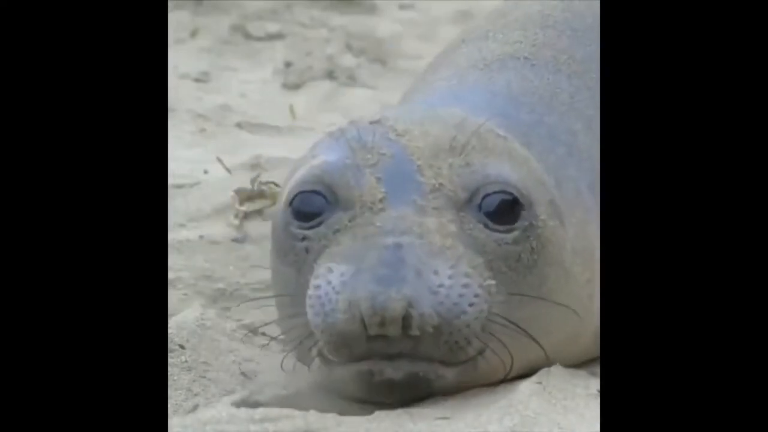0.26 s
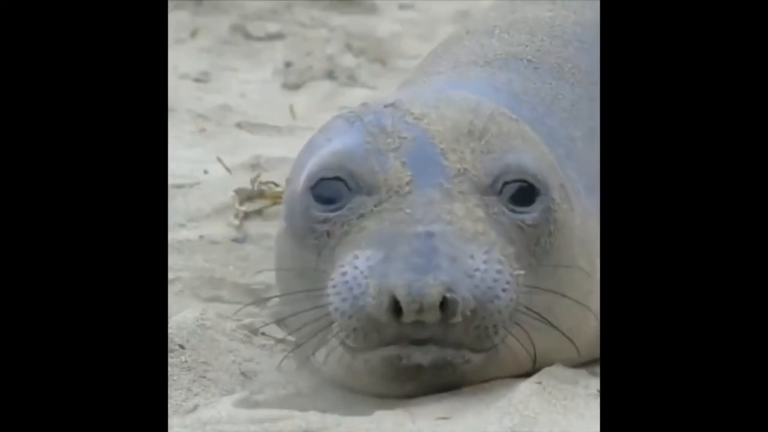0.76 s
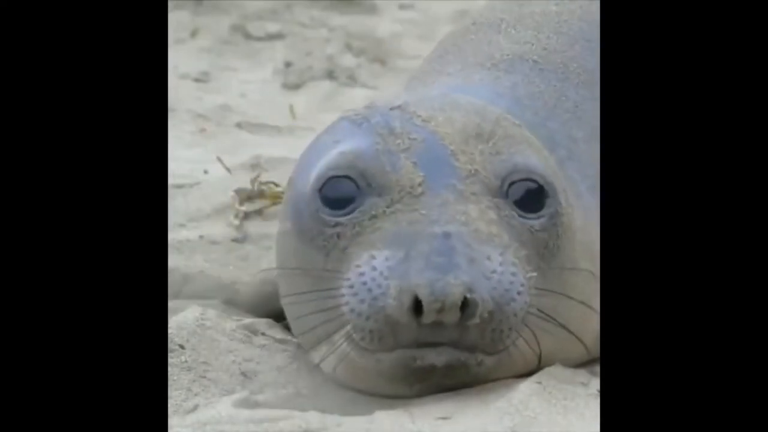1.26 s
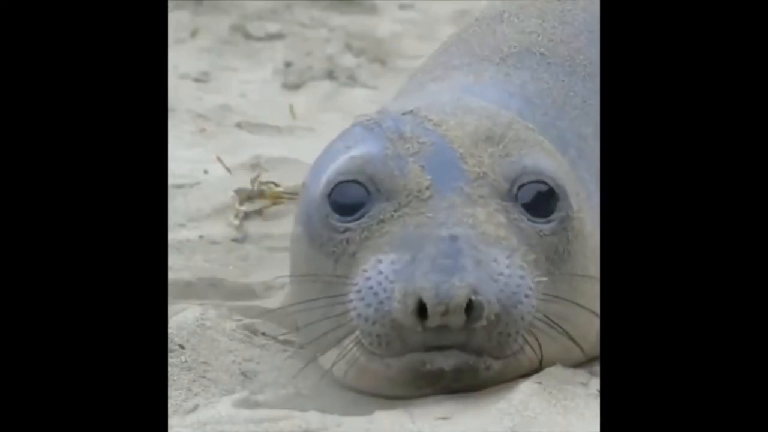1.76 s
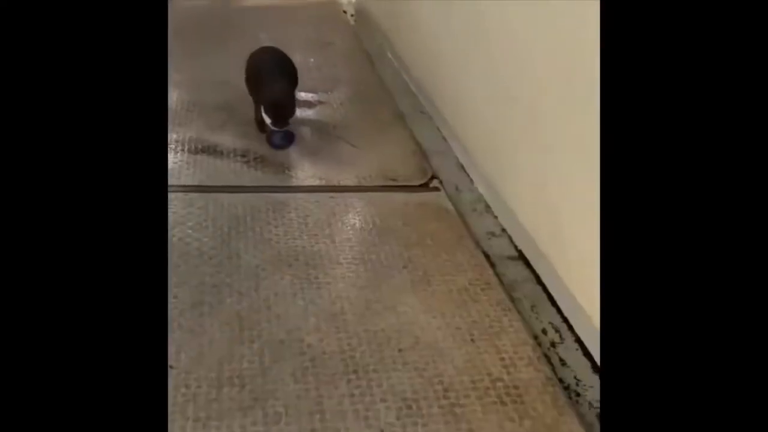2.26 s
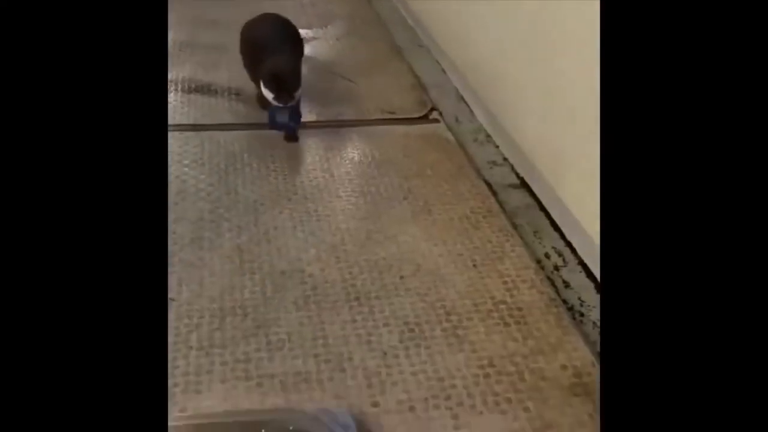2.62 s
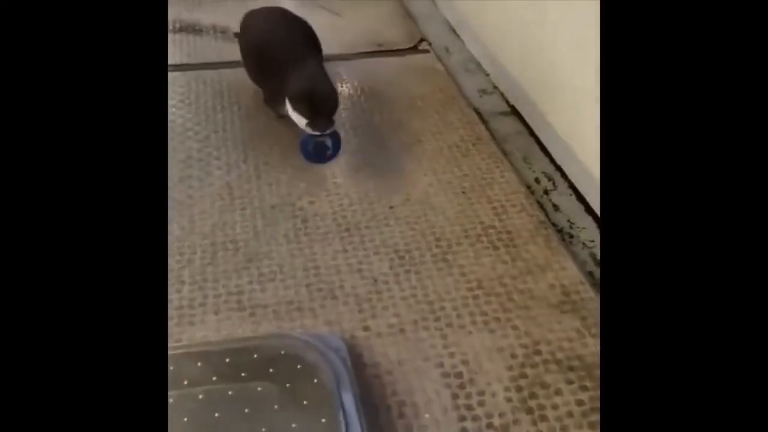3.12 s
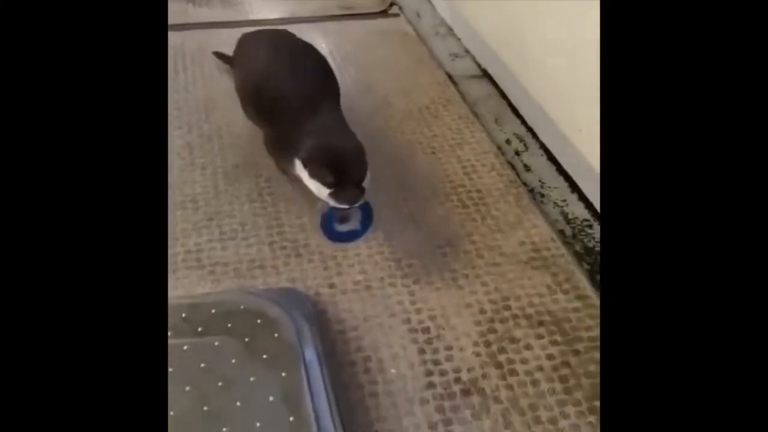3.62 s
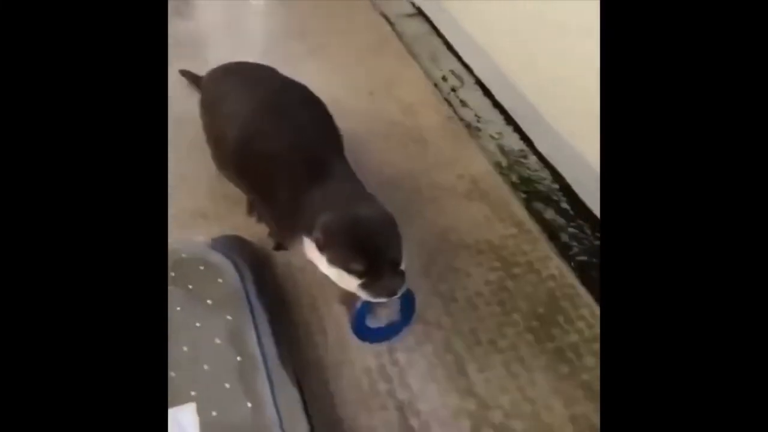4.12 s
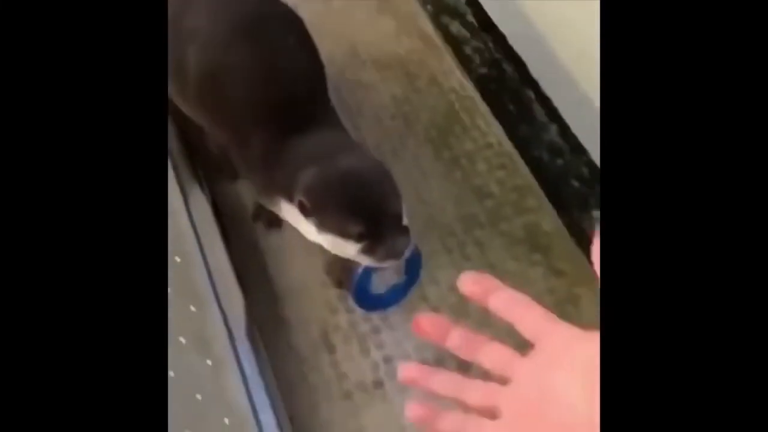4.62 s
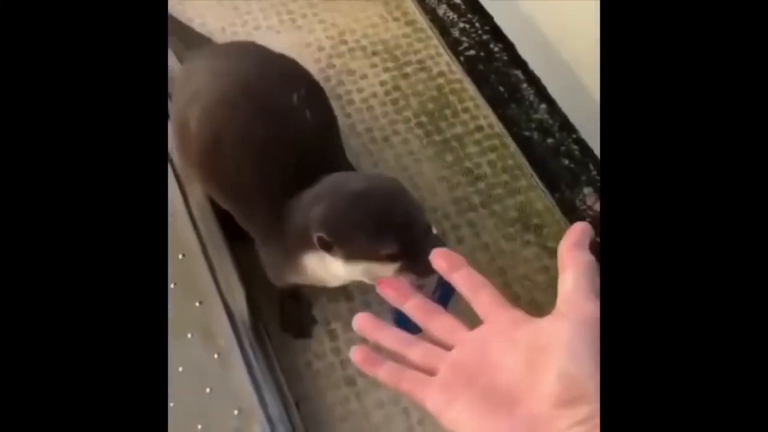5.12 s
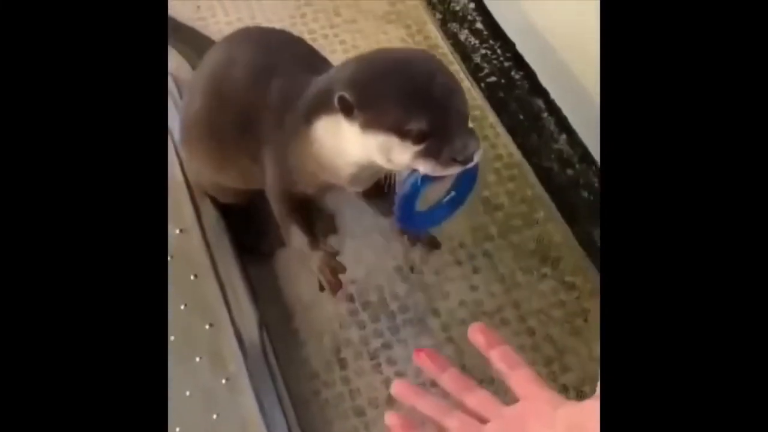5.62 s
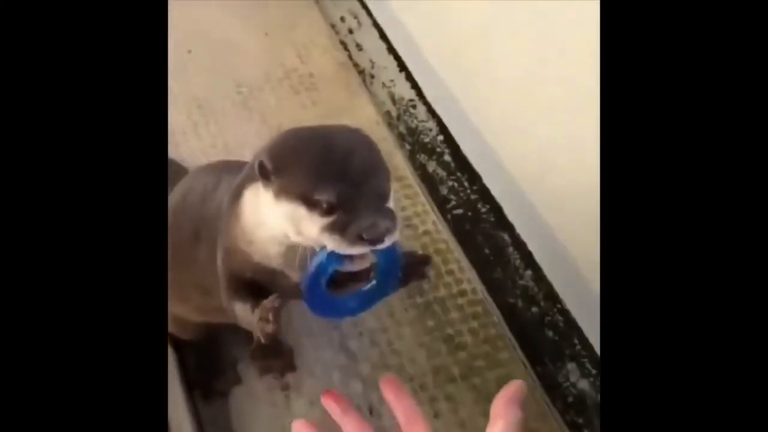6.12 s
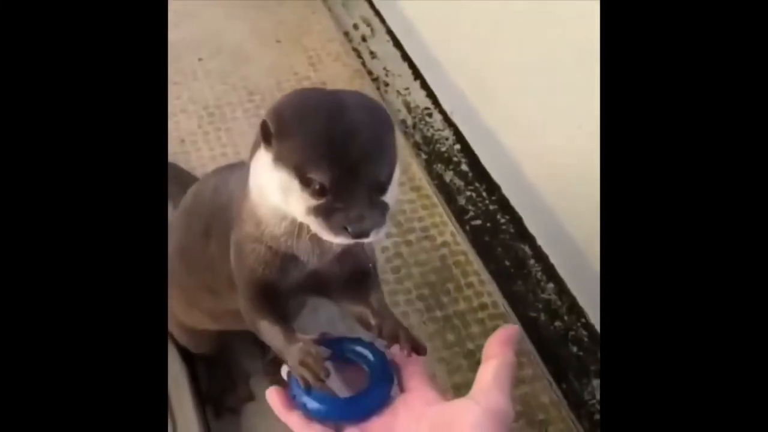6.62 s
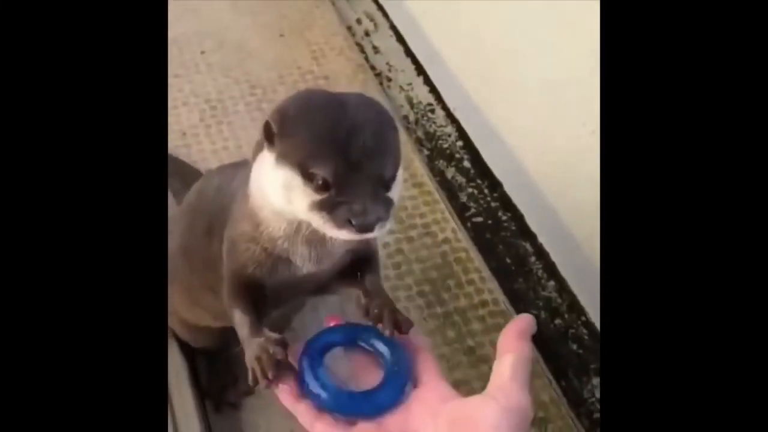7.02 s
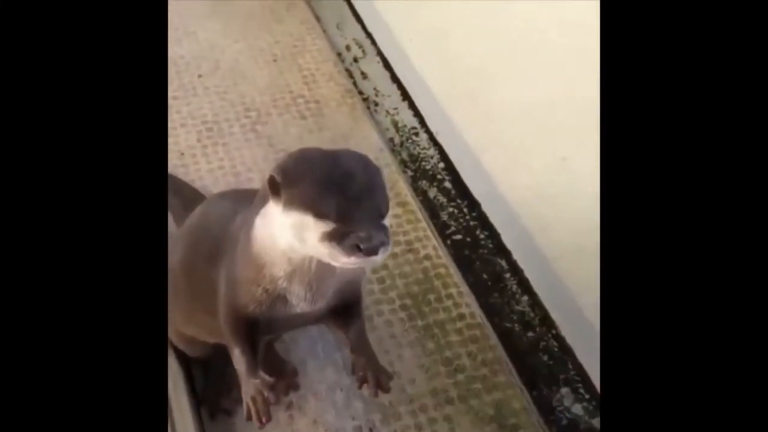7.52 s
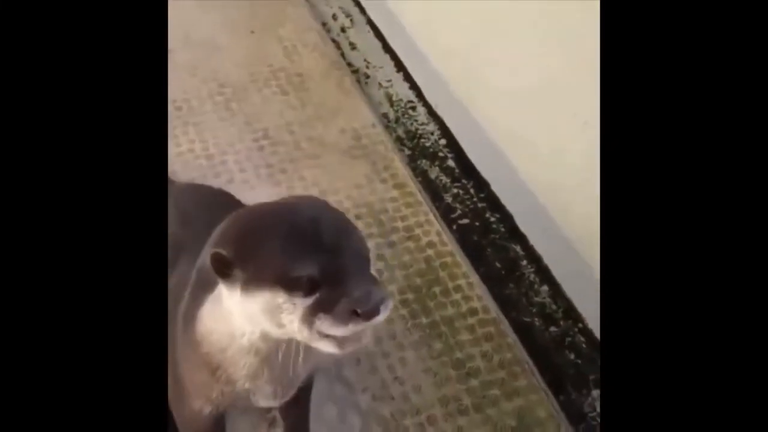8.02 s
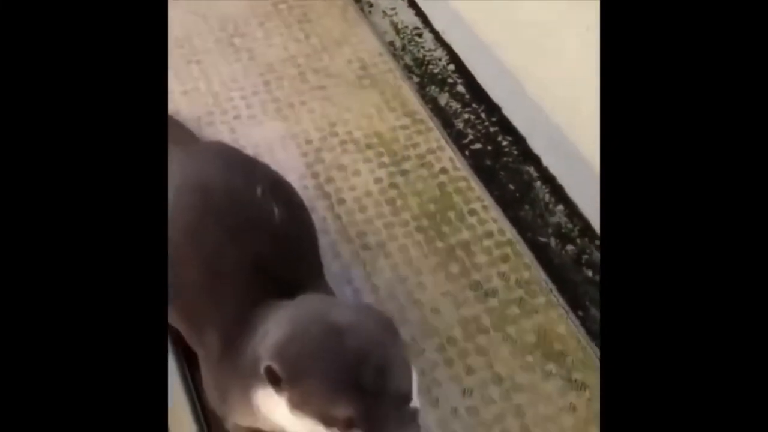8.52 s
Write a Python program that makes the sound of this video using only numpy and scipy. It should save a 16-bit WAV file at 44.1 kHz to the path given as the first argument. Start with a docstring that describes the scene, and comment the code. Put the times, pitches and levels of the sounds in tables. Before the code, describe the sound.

From 0 to about 2.15 seconds, an even, soft surf wash with flickering spray lies under a young seal close by. It gives a tiny low grunt at 0.2, a swelling nostril hiss ending in a puff by 0.7, then short, muffled, wavering hoots until 2.0. The surf cuts out; silence lasts until 2.35. A small hard-walled pen then begins with ventilation rumble, faint hum and a cluster of dull bumps until 2.8. An otter squeals and chirps roughly, with a falling whine at 3.0-3.5, chirps near 3.9, and a longer squeal at 4.0-4.85. Teeth and ring click around 4.7-5.3. Chirps at 5.4 lead into a piercing whine until 6.1, then a wavering, descending squeal from 6.5 to 7.5. Afterward only claw ticks, soft thuds, scuffs, a sharper click at 8.2 and a thin fur brush remain over the rumble.

```python
"""Seal on a beach, then an otter in a pen

A young seal gives low, soft grunts and a snort over the wash of the surf; both are built from waves and coloured noise.
After a short silence an otter trots up with a plastic ring in a small hard-walled pen. Its quick chirps and long
falling squeals are stacks of overtones shaped by throat and mouth, with breath noise for the rough parts.
Bumps, claws and the ring click and echo over a low ventilation rumble and a faint hum."""
import sys
import numpy as np
from scipy import signal
from scipy.fft import rfft, irfft
from scipy.io import wavfile
from scipy.ndimage import uniform_filter1d, map_coordinates

SR = 44100
rng = np.random.default_rng(int(sys.argv[2]) if len(sys.argv) > 2 else 0)


def int16_out(signal):
    """Quantize to a 16-bit WAV file."""
    q = np.round(np.clip(np.atleast_2d(signal).T, -1, 1) * 32767)
    wavfile.write(sys.argv[1], SR, q.astype(np.int16))


N = 386316
TIME = np.arange(N) / SR
CUTOFF_HZ = 14000   # top of the voices and of the final sound


def from_db(db):
    """Turn decibels into a plain multiplier."""
    return 10 ** (np.asarray(db) / 20)


def rms_one(x):
    """Scale a sound to unit power."""
    return x / np.sqrt(np.mean(x ** 2) + 1e-20)


def at_hz(points, hz):
    """Read a spectrum between its points, on a log-frequency axis."""
    f, value = np.transpose(points)
    return np.interp(np.log(np.maximum(hz, 1)), np.log(f), value)


def along(rows, t):
    """Read every column of a curve at the times t."""
    s, *columns = np.transpose(rows)
    return [np.interp(t, s, c) for c in columns]


def resonance(hz, centre_hz, octaves):
    """Bell of height 1 on a log-frequency axis, at half height the given octaves from its centre."""
    return 1 / (1 + (np.log2(hz / centre_hz) / octaves) ** 2)


def filtered(x, hz, kind, order=2):
    """Keep part of the spectrum with a Butterworth filter."""
    hz = np.clip(hz, 10, SR / 2 - 100)
    return signal.sosfilt(signal.butter(order, hz, kind, fs=SR, output="sos"), x)


def noise(spectrum):
    """Steady noise of a given colour, at unit power."""
    gain = from_db(at_hz(spectrum, np.fft.rfftfreq(N, 1 / SR)))
    return rms_one(irfft(rfft(rng.standard_normal(N)) * gain, N))


def drift(rate, t):
    """Smooth random wandering with spread near 1; the rate is in random points per second."""
    knots = rng.standard_normal(4096)
    return map_coordinates(knots, [(t - t[0]) * rate], order=2, mode="wrap")


def gate(t, start, end, edge_s):
    """1 between start and end, with short ramps."""
    opening = np.clip((t - start) / edge_s + .5, 0, 1)
    closing = np.clip((end - t) / edge_s + .5, 0, 1)
    return opening * closing


def add(out, start, sound):
    """Mix a sound in from a given time."""
    i = max(round(start * SR), 0)
    out[i:i + len(sound)] += sound[:N - i]


def gesture(rows, glide_s):
    """Times, soft gate and rounded control curves of one call."""
    s, *columns = np.transpose(rows)
    t = np.arange(s[0] - glide_s / 2, s[-1] + glide_s / 2, 1 / SR)
    width = int(glide_s * SR) + 1
    curves = [uniform_filter1d(np.interp(t, s, c), width) for c in columns]
    return t, gate(t, s[0], s[-1], glide_s), curves


# how loud the wash is, with an abrupt cut in the sound near the end: (time [s], level [dB])
SURF_LEVEL = [(0.02, -40), (0.96, -42.5), (0.99, -43), (1.97, -41), (2.1, -42), (2.1, -65), (2.12, -35.5),
              (2.14, -45)]
# colour of the surf: (frequency [Hz], level [dB])
SURF_COLOUR = [(18, -85), (30, -35), (61, -10), (102, -12.5), (132, -3.5), (173, -4), (207, -5),
               (266, -1.5), (317, -6.5), (706, -10), (1230, -8), (2950, -12), (4990, -23.5), (10600, -41),
               (12000, -51), (15600, -85), (22000, -120)]


def surf(spray_db=-12.5, split_hz=4300, flicker_db=1.5):
    """Even wash of coloured noise with a fizz of spray flickering on top."""
    wash = filtered(noise(SURF_COLOUR), split_hz, "low", order=4)
    wash = wash / np.std(filtered(wash, [400, 4000], "band"))   # unit power in the middle range
    fizz = filtered(noise(SURF_COLOUR), split_hz, "high", order=4)
    fizz = rms_one(filtered(fizz, 11800, "low", order=16))
    flickering = from_db(spray_db + flicker_db * drift(14.2, TIME))
    return (wash + fizz * flickering) * from_db(along(SURF_LEVEL, TIME)[0])


# colour of the ventilation: (frequency [Hz], level [dB])
VENTILATION_COLOUR = [(25, -17), (55, 2), (115, 1.5), (200, -6), (330, -8.5), (550, -14.5), (1300, -17),
                      (2100, -19.5), (3200, -29), (5200, -29), (7500, -38.5), (14500, -38)]


def ventilation(level_db=-48.5, waver_db=1.95):
    """Low rumble of moving air: coloured noise that wavers a little."""
    return noise(VENTILATION_COLOUR) * from_db(level_db + waver_db * drift(12, TIME))


def hum(pitch_hz=119, level_db=-56, waver_db=0.97):
    """Faint steady hum: one sine wave of slightly wandering level."""
    tone = np.sqrt(2) * np.sin(2 * np.pi * pitch_hz * TIME)
    return tone * from_db(level_db + waver_db * drift(7.3, TIME))


# echo of the pen: (frequency [Hz], time to fade by 60 dB [s], relative level [dB])
PEN_ECHO = [(202, 0.46, -20), (940, 0.45, -11), (2090, 0.18, -3), (3020, 0.22, -21), (6230, 0.44, -7),
            (11800, 0.049, -6.5)]


def pen_echo(x):
    """Close hard walls: a dense tail whose bands fade at their own speeds, the highest fastest."""
    t, table = np.arange(SR // 2) / SR, np.array(PEN_ECHO)
    edges, tail = np.geomspace(110, 14080, 8), 0   # seven bands, one octave each
    for low, high in zip(edges, edges[1:]):
        t60, db = (at_hz(table[:, [0, c]], np.sqrt(low * high)) for c in (1, 2))
        decay = from_db(-60 * t / t60) * np.clip(t / 0.0014, 0, 1)
        band = filtered(rng.standard_normal(len(t)), [low, high], "band")
        tail = tail + from_db(db) * band * decay / np.linalg.norm(decay)
    return signal.fftconvolve(x, tail)[:N]


def brush(start_s=8.15, end_s=8.44, swell_s=0.15, level_db=-60, low_hz=9000):
    """Fur sweeps past close by: a thin, airy swell of high noise."""
    hiss = rms_one(filtered(rng.standard_normal(N), [low_hz, CUTOFF_HZ], "band"))
    return hiss * gate(TIME, start_s, end_s, swell_s) * from_db(level_db + 2 * drift(60, TIME))


# colour of the scuffs: (frequency [Hz], level [dB])
SCUFF_COLOUR = [(1000, 3.5), (2000, 15), (3200, 7), (5300, 4.5), (7200, 2.5), (10500, -5), (13200, -18),
                (14500, 13.5)]
# scuffs of fur and paws on the floor: (middle [s], half length [s], level before the trim [dB])
SCUFFS = [(3.717, 0.13, -42), (4.04, 0.091, -33.5), (4.156, 0.13, -53), (5.19, 0.18, -48.5),
          (6.26, 0.12, -44.5), (7.573, 0.28, -45), (8.258, 0.18, -46), (8.44, 0.22, -45)]


def scuffs(floor_db=-57.5, trim_db=-7.0, grain_db=3.5, catch_db=4.5):
    """Each scuff swells and fades over a faint floor; fur and paws catch and slip in small grains."""
    level = from_db(floor_db)   # the trim lowers this too
    for middle_s, half_s, db in SCUFFS:
        level = level + from_db(db) * np.exp(-((TIME - middle_s) / half_s) ** 2)
    unevenness_db = catch_db * drift(30, TIME) + grain_db * drift(350, TIME)
    return noise(SCUFF_COLOUR) * level * from_db(trim_db + unevenness_db)


# claw ticks while the otter walks and turns:
# (start [s], end [s], pace [ticks per s], level before filtering and chance [dB])
PATTER = [(2.399, 8.4, 3.5, -48.5), (7.549, 8.1, 7.4, -57)]


def patter(t60=0.02, spread_db=5, low_hz=2800, high_hz=9500):
    """Claws tick on the floor at an uneven pace: tiny fading bursts of noise."""
    out, t = np.zeros(N), np.arange(SR // 20) / SR
    for start, end, per_s, level_db in PATTER:
        for s in np.arange(start, end, 1 / per_s):
            burst = rng.standard_normal(len(t)) * from_db(-60 * t / t60)
            tick = filtered(burst, [low_hz, high_hz], "band", order=1)
            level = from_db(level_db + spread_db * rng.uniform(-1, 1))
            add(out, s + rng.random() / per_s, level * tick)
    return out


# dull bumps: (time [s], thud level [dB], thud pitch [Hz], knock against thud before the trim [dB])
BUMPS = [(2.354, -19, 132, -0.5), (2.386, -16, 121, -11.5), (2.423, -18.5, 216, -29),
         (2.452, -16, 189, -1.5), (2.47, -14, 131, -33), (2.554, -18, 108, -10.5), (2.591, -20, 210, -2),
         (2.605, -14, 87.6, -35), (2.654, -18.5, 91, -42), (2.706, -26, 149, -28), (2.796, -20, 147, -32),
         (4.628, -45, 251, 12), (6.327, -29.5, 131, -32), (7.637, -31, 116, -12), (7.683, -30.5, 140, -23)]


def bumps(thud_t60=0.063, knock_t60=0.076, knock_trim_db=-1, knock_hz=290, crunch_share=0.53):
    """Each bump is a heavily damped low swing with a short hollow knock on top."""
    out, t = np.zeros(N), np.arange(SR // 4) / SR
    for s, level_db, thud_hz, upper_db in BUMPS:
        thud = np.sin(2 * np.pi * thud_hz * t) * from_db(-60 * t / thud_t60)
        crunch = rms_one(filtered(rng.standard_normal(len(t)), [170, 560], "band"))
        pitch = knock_hz * from_db(rng.standard_normal())   # chance retunes it by about 12 percent
        hollow = np.sin(2 * np.pi * pitch * t)
        knock = (hollow + crunch_share * crunch) * from_db(-60 * t / knock_t60)
        add(out, s, from_db(level_db) * (thud + from_db(upper_db + knock_trim_db) * knock))
    return filtered(out, 44, "high", order=3)


# clicks of teeth, claws and ring, and a few short otter chips:
# (time [s], level before the trim [dB], ring [Hz], upper ring against it [dB], time to fade by 60 dB [s])
CLICKS = [(2.36, -34, 5040, -19, 0.044), (2.795, -20.5, 2000, -35, 0.021), (3.167, -40, 3900, 1, 0.027),
          (3.705, -22.5, 2130, -12.5, .044), (4.735, -17.5, 7180, -20, .035),
          (4.888, -32.5, 2980, -14, 0.017), (5.045, -25, 3020, -3.5, 0.046), (5.1, -35.5, 2210, -9, 0.24),
          (5.257, -43, 3100, -2, .006), (5.652, -31.5, 3170, -12, 0.034), (6.267, -31.5, 4200, -9.5, .021),
          (7.36, -29, 4660, -2, 0.02), (7.495, -30, 6400, 1, 0.01), (7.577, -39.5, 4500, -4, 0.025),
          (7.688, -36, 4680, -8, 0.026), (7.754, -34.5, 3770, -3, 0.011), (7.916, -38, 3860, -23, 0.019),
          (8.065, -43, 5060, -8, .016), (8.224, -20, 1230, -28, 0.022), (8.224, -20, 1950, -3.5, 0.027),
          (8.342, -42, 3240, -11, 0.25)]


def clicks(rise_s=0.00019, width=0.14, crack_db=-11, trim_db=-7, upper_ratio=2.75):
    """Clicks and chips: a short crunch of noise rings in two broad resonances."""
    out, t = np.zeros(N), np.arange(SR // 5) / SR

    def ringing(hz):
        band = [hz * (1 - width), hz * (1 + width)]
        return rms_one(filtered(rng.standard_normal(len(t)), band, "band"))

    for s, level_db, ring_hz, upper_db, t60 in CLICKS:
        ring = ringing(ring_hz)
        upper = ringing(min(upper_ratio * ring_hz, 12000))
        crack = rms_one(filtered(rng.standard_normal(len(t)), [700, 7000], "band", order=1))
        shape = (1 - np.exp(-t / rise_s)) * from_db(-60 * t / t60)
        mix = ring + from_db(upper_db) * upper + from_db(crack_db) * crack
        add(out, s, from_db(level_db + trim_db) * shape / shape.max() * mix)
    return out


def snort(start_s=0.36, end_s=0.71, edge_s=0.027, level_db=-46, swell_db_per_s=25,
          low_hz=4500, high_hz=9500, puff_db=-43, puff_s=0.092):
    """The seal blows through its nostrils: a growing hiss that ends in a low puff."""
    hiss = rms_one(filtered(noise(SURF_COLOUR), [low_hz, high_hz], "band"))
    swell = from_db(level_db + swell_db_per_s * np.minimum(TIME - end_s, 0))
    puff = rms_one(filtered(rng.standard_normal(N), [45, 700], "band"))
    puff_shape = from_db(puff_db) * np.exp(-((TIME - end_s + puff_s / 2) / puff_s) ** 2)
    return gate(TIME, start_s, end_s, edge_s) * (hiss * swell + puff * puff_shape)


# seal grunts: (start [s], end [s], first pitch [Hz], last pitch [Hz], level [dB])
GRUNTS = [(.2, 0.257, 236, 218, -44), (0.647, 0.684, 214, 227, -40), (.96, 1.077, 265.3, 295, -44),
          (1.15, 1.367, 188.2, 169, -45.5), (1.555, 1.593, 283, 252, -47), (1.6, 1.69, 160.7, 130, -41.5),
          (1.81, 1.878, 188, 146, -44.5), (1.89, 1.985, 161, 234, -45)]


def grunts(jitter=0.066, shimmer=0.38, slope_db=-13):
    """Low, wavering hoots through a closed mouth; the harmonics fall away fast, by slope_db per octave."""
    out = np.zeros(N)
    for start, end, first_hz, last_hz, level_db in GRUNTS:
        t, voiced, (pitch,) = gesture([(start, first_hz), (end, last_hz)], glide_s=0.024)
        phase = 2 * np.pi * np.cumsum(pitch * (1 + jitter * drift(78.5, t))) / SR
        tone = sum(from_db(slope_db * np.log2(k)) * np.sin(k * phase) for k in range(1, 5))
        unsteady = rms_one(tone * (1 + shimmer * drift(57, t)))
        add(out, start, from_db(level_db) * voiced * unsteady)
    return out


# the otter's throat and mouth: (frequency [Hz], level [dB])
THROAT = [(600, -10), (950, -7), (1400, -12.5), (2250, 0.5), (2900, -19), (3300, -11.5), (3750, -19.5),
          (4300, -12.5), (4950, -11.5), (5500, -12), (6250, -10), (7500, -9.5), (8500, -12), (9200, -22.5),
          (10100, -8.5), (11400, -20.5), (14000, -23)]


def larynx(t, pitch, jitter, flutter_db, count=18):
    """Harmonics of an unsteady pitch, the overtones waxing and waning at random: frequencies, gains, waves."""
    k = np.arange(1, count + 1)[:, None]
    wobble = jitter * (drift(130, t) + drift(600, t)) + 0.00298 * drift(34.9, t)
    phase = 2 * np.pi * np.cumsum(pitch * (1 + wobble)) / SR
    flutter = np.array([drift(15.86, t) for _ in k]) * (k > 2)   # none on the two lowest
    gains = from_db(at_hz(THROAT, k * pitch) + flutter_db * flutter) * (k * pitch < CUTOFF_HZ)
    return k * pitch, gains, np.sqrt(2) * np.sin(k * phase)


def rasp(t, wave, hiss):
    """Air leaks through the vocal folds: breath noise that swells once a cycle."""
    return hiss[:len(t)] * (1 + wave / 2)


# otter chirps: (crest [s], rise [s], fall [s], first pitch [Hz], crest pitch [Hz], last pitch [Hz],
#                level before edge and flare [dB], roughness [0-1], overtone tilt [dB per octave])
CHIRPS = [(2.785, .002, 0.0046, 2420, 2330, 2080, -26, 0.54, -8),
          (2.869, .035, 0.02, 1745, 2190, 1190, -36.5, 0.85, -2),
          (2.881, .002, 0.031, 2080, 1898, 872, -28.5, 0.78, -11),
          (2.987, .05, .028, 1161, 2067, 1280, -32, .7, -6.5),
          (3.002, .002, 0.0062, 2270, 2260, 1580, -27, 0.8, -3),
          (3.846, 0.035, 0.041, 1400, 2290, 891, -24, 0.24, -8),
          (3.972, 0.036, 0.027, 1270, 1625, 1295, -32.5, 0.5, -9.5),
          (5.408, 0.024, 0.0022, 772, 1033, 1060, -25, 0.42, -6.5),
          (5.442, 0.026, 0.019, 1286, 1980, 1380, -26, 0.25, -7.5)]


def chirps(hiss, rasp_db=-13, rasp_hz=3800, jitter=0.019, shimmer=0.89,
           nose_hz=2100, nose_octaves=0.11, nose_db=11, flare=0.52, arch=1.4, edge_db=-4):
    """Quick arches of pitch; the voice flares whenever a partial crosses the nasal resonance."""
    out, hiss = np.zeros(N), filtered(hiss, rasp_hz, "low")
    for crest_s, rise_s, fall_s, first_hz, crest_hz, last_hz, level_db, rough, tilt_db in CHIRPS:
        # distance from the crest: -1 at the start, 0 at the crest, 1 at the end
        path = [(crest_s - rise_s, -1), (crest_s, 0), (crest_s + fall_s, 1)]
        t, voiced, (away,) = gesture(path, glide_s=0.003)
        droop = (1 - np.exp(-(arch * away) ** 2)) / (1 - np.exp(-arch ** 2))
        pitch = crest_hz + (np.where(away < 0, first_hz, last_hz) - crest_hz) * droop
        hz, gains, waves = larynx(t, pitch, jitter * rough, flutter_db=4.0)
        nose = nose_db * resonance(hz, nose_hz, nose_octaves)
        gains = gains * from_db(tilt_db * np.log2(hz / pitch) + nose)
        strength = np.linalg.norm(gains, axis=0)
        tone = np.sum(gains * waves, axis=0) / strength * (1 + shimmer * rough * drift(235, t))
        breath = from_db(rasp_db) * rough * rasp(t, waves[0], hiss)
        level = from_db(level_db + edge_db * away ** 2) * (strength / strength.max()) ** flare
        add(out, t[0], voiced * level * (tone + breath))
    return out


# otter squeals; the last two tables are one continuous squeal in two stretches:
# (time [s], pitch [Hz], level before the trim [dB], overtone level before the trim [dB])
SQUEALS = [
    [(2.355, 1140, -30, -39.5), (2.393, 1138, -37, -48), (2.441, 1099, -31.5, -50),
     (2.461, 1007, -39, -44.5), (2.573, 917, -33.5, -50), (2.6, 848, -45, -56.5)],
    [(3.012, 1342, -29.5, -47), (3.03, 1204, -45, -50), (3.066, 1240, -30, -46), (3.172, 1198, -33, -42),
     (3.352, 1090, -30.5, -48.5), (3.396, 985, -43, -43), (3.452, 987, -36, -45),
     (3.476, 868, -36.5, -46.5), (3.49, 798, -43.5, -39)],
    [(3.995, 1300, -46, -48), (4.017, 1190, -32.5, -43), (4.053, 1269, -35.5, -48),
     (4.097, 1188, -31, -45.5), (4.151, 1237, -26.5, -37.5), (4.259, 1103, -26, -37.5),
     (4.329, 1096, -23, -39), (4.529, 948.7, -28, -36.5), (4.631, 971, -27, -34.5), (4.649, 925, -30, -34),
     (4.733, 935, -32, -29), (4.757, 872, -26, -33), (4.807, 784, -31, -38), (4.833, 748, -31.5, -51),
     (4.85, 756, -40, -40)],
    [(5.465, 1305, -33, -36), (5.483, 1218, -30, -54), (5.517, 1570, -33, -41), (5.549, 1340, -33, -41.5),
     (5.609, 1237, -27.5, -39), (5.755, 1282, -28, -33.5), (5.901, 1193, -24.5, -40.5),
     (6.009, 1196, -26, -45), (6.049, 1146, -28.5, -47.5), (6.069, 950, -32.5, -43.5),
     (6.085, 866, -41, -58)],
    [(6.515, 964, -28, -53), (6.547, 1223, -31, -46), (6.561, 1202, -43, -52), (6.579, 1010, -31, -35.5),
     (6.615, 1048, -36, -40.5), (6.667, 893, -33.5, -49.5), (6.733, 943, -36.5, -46),
     (6.773, 900, -40.5, -43), (6.8, 976, -36, -43)],
    [(6.8, 931.6, -41, -44), (6.83, 1177, -15.5, -42.5), (6.864, 1195, -37.5, -38.5),
     (6.918, 1306, -34, -36), (7.044, 1170, -30.5, -38), (7.102, 1146, -25, -41.5),
     (7.126, 1003, -39.5, -43), (7.156, 1009, -25.5, -41), (7.186, 978.4, -42, -36),
     (7.226, 889, -32.5, -38.5), (7.32, 837, -26, -40.5), (7.34, 842.4, -25, -41.5),
     (7.408, 759, -36.5, -39), (7.432, 715, -26.5, -31), (7.464, 659, -32, -44), (7.49, 660, -32.5, -38)],
]
# colour of each squeal table: (octave lift [dB], overtone tilt [dB per octave],
#     roughness added at the start [0-1], when steady [0-1], added when sagging [0-1],
#     mouth resonance at the start [Hz], at the end [Hz], its lift [dB])
SQUEAL_COLOURS = [(-8, -4, 0.45, 0.24, 0.44, 3600, 3700, 12), (0.5, -5.5, 0.76, .06, 0.79, 6050, 6100, 6),
                  (1, -1, 0.97, 0.038, 0.7, 6120, 6600, 10), (-1, -3.5, 0.3, .02, 0.32, 6500, 6080, 10),
                  (-8, -6, 0.5, .02, .05, 3150, 2800, 9.5), (4, -1.5, .04, 0.103, 0.26, 5600, 2640, 8)]
# fixed resonances of the muzzle: (frequency [Hz], lift [dB])
MUZZLE = [(2920, 13), (3720, 9), (4950, -1)]
# the voice frays as each table starts and as its pitch sags
FRAY_S, SAG_FROM_HZ, SAG_SPAN_HZ = 0.057, 1085, 292


def squeals(hiss, closing_db=-15, closing_s=0.04, rasp_db=-17, low_trim_db=-1, overtone_trim_db=-2.5,
            waver_db=1.8, jitter=0.0158, shimmer=0.33, mouth_octaves=0.033, muzzle_octaves=0.053,
            nose_hz=2350, nose_octaves=0.033, nose_db=2):
    """Long whines: two low partials, and overtones sliding through throat, muzzle and a moving mouth."""
    out = np.zeros(N)
    for rows, colour in zip(SQUEALS, SQUEAL_COLOURS):
        octave_db, tilt_db, at_start, steady, sagging, first_hz, last_hz, mouth_db = colour
        t, voiced, (pitch, level, overtone_level) = gesture(rows, glide_s=0.0098)
        fray = at_start * np.exp(-(t - t[0]) / FRAY_S)
        sag = sagging * np.clip((SAG_FROM_HZ - pitch) / SAG_SPAN_HZ, 0, 1)
        rough = steady + fray + sag
        hz, gains, waves = larynx(t, pitch, jitter * rough, flutter_db=4.5)

        low = gains[:2] * from_db(nose_db * resonance(hz[:2], nose_hz, nose_octaves))
        # the octave fades as the mouth closes
        closing = closing_db * np.exp((t - t[-1]) / closing_s)
        low[1] *= from_db(octave_db + waver_db * drift(17.1, t) + closing)

        mouth_hz = np.linspace(first_hz, last_hz, len(t))
        mouth = mouth_db * resonance(hz[2:], mouth_hz, mouth_octaves)
        muzzle = sum(db * resonance(hz[2:], f, muzzle_octaves) for f, db in MUZZLE)
        high = gains[2:] * from_db(tilt_db * np.log2(hz[2:] / pitch) + mouth + muzzle)

        # the partials of each register share out its power
        low = low * from_db(level + low_trim_db) / np.linalg.norm(low, axis=0)
        high = high * from_db(overtone_level + overtone_trim_db) / np.linalg.norm(high, axis=0)
        gains = np.vstack([low, high])
        tone = np.sum(gains * waves, axis=0) * (1 + shimmer * rough * drift(220, t))
        strength = np.linalg.norm(gains, axis=0)
        breath = from_db(rasp_db) * rough * strength * rasp(t, waves[0], hiss)
        add(out, t[0], voiced * (tone + breath))
    return out


def beach():
    """The surf under the seal's snort and grunts."""
    return surf() + snort() + grunts()


# the echo's share, strongest near 3 s, weakest near 4.4 s, then slightly up: (time [s], level [dB])
ECHO_SHARE = [(2.35, 5.5), (3.0, 10), (3.9, 5.5), (4.4, 0), (5.6, 2.5), (8.7, 2)]


def pen():
    """The otter and its contacts echo in the room, over ventilation and hum; scuffs and brush stay dry."""
    hiss = noise(THROAT)
    direct = patter() + bumps() + clicks() + chirps(hiss) + squeals(hiss)
    echo = pen_echo(direct * from_db(along(ECHO_SHARE, TIME)[0]))
    return ventilation() + hum() + brush() + scuffs() + echo + direct


def scene(beach_end_s=2.163, pen_start_s=2.347):
    """Beach, silence, pen; the same in both ears."""
    beach_part = beach() * gate(TIME, -1, beach_end_s, 0.0064)
    pen_part = pen() * gate(TIME, pen_start_s, 10, 0.0024)
    mono = beach_part + pen_part
    return np.array([mono, mono])


def record(dry):
    """Cut the top steeply with an elliptic low-pass filter."""
    return signal.sosfilt(signal.ellip(10, .1, 80, CUTOFF_HZ, fs=SR, output="sos"), dry)


dry = scene()
out = record(dry)
int16_out(out)
```